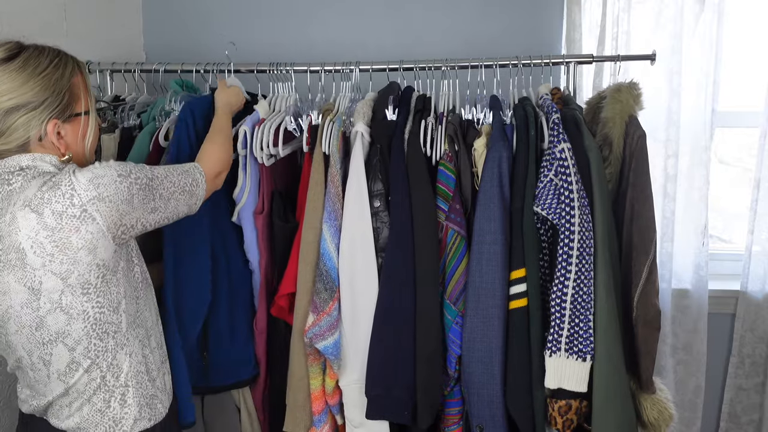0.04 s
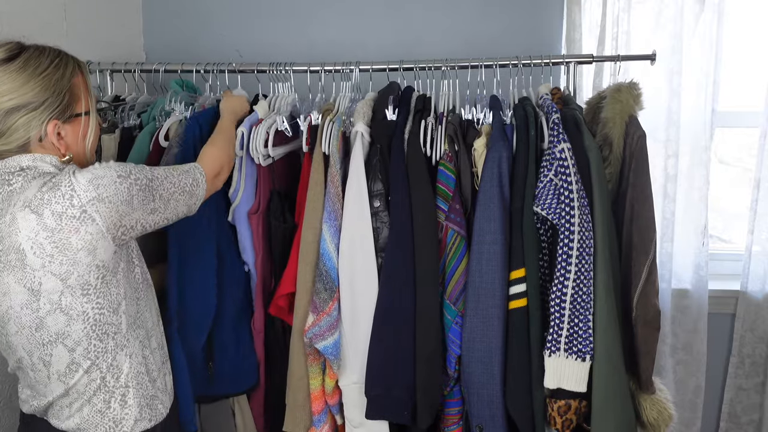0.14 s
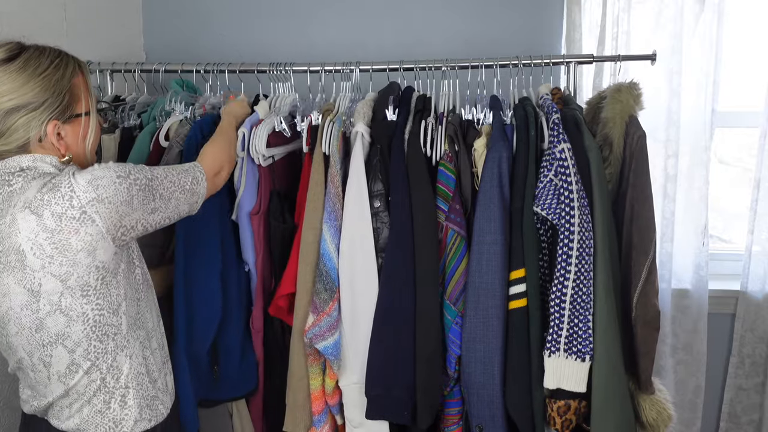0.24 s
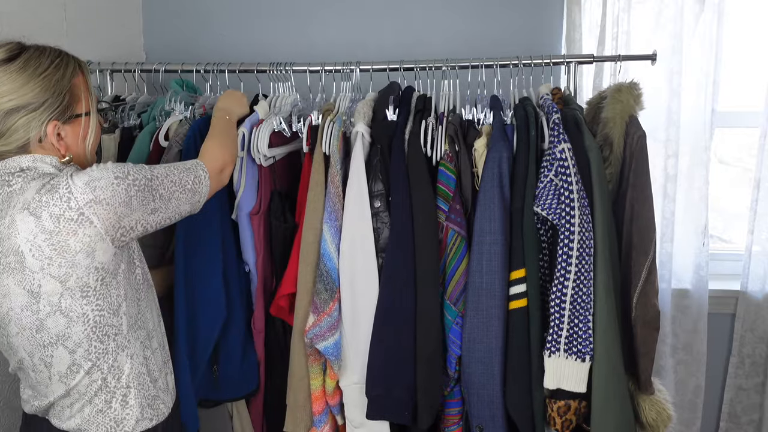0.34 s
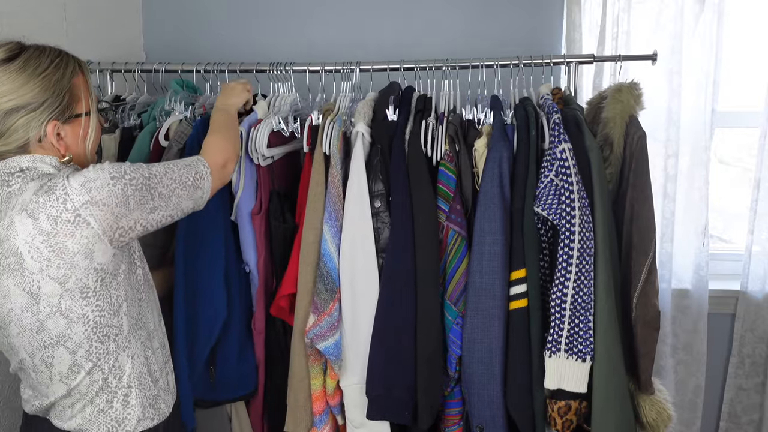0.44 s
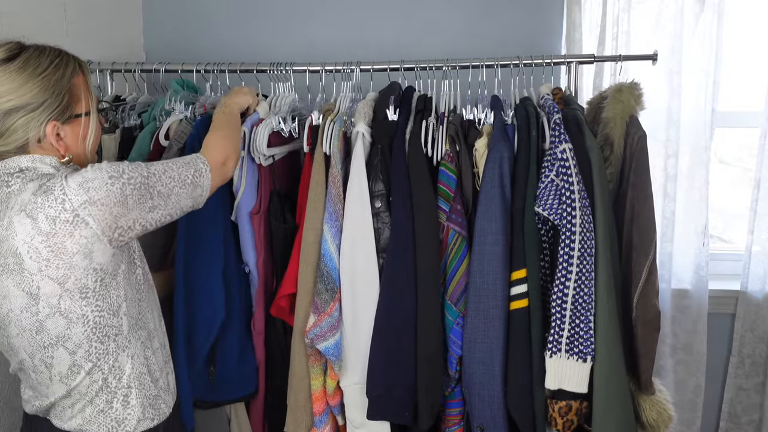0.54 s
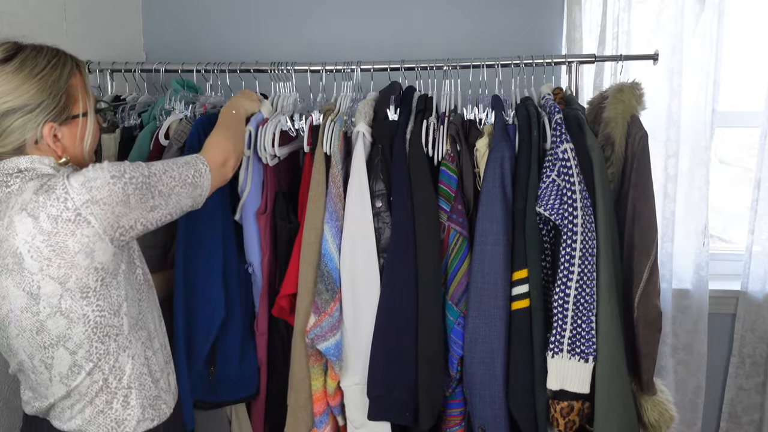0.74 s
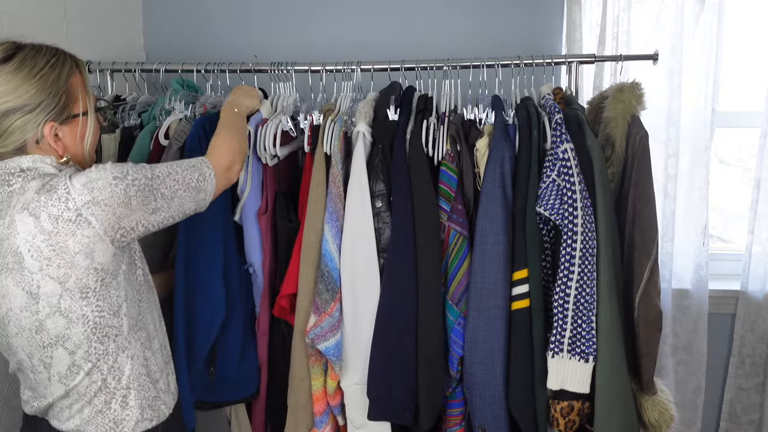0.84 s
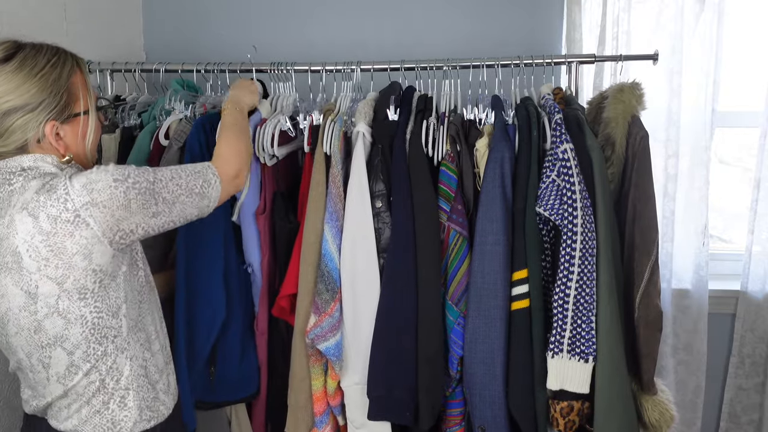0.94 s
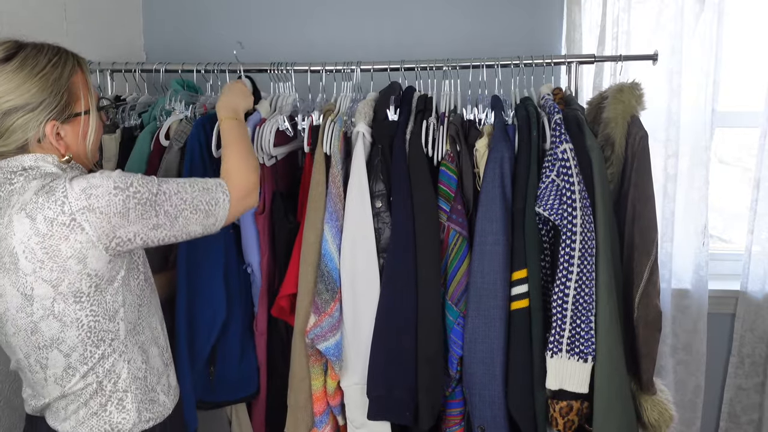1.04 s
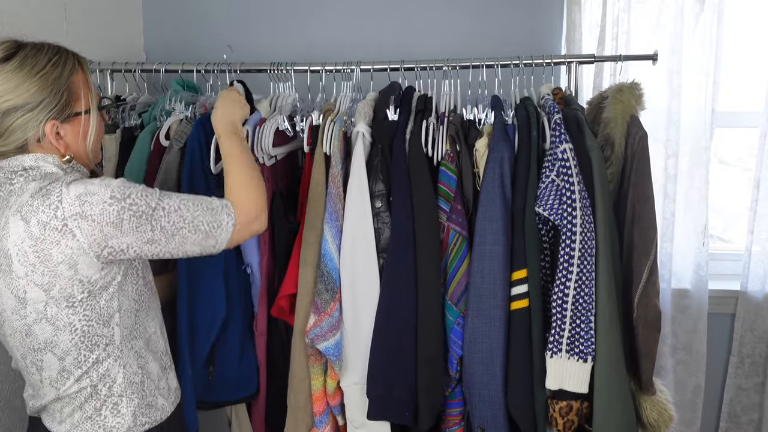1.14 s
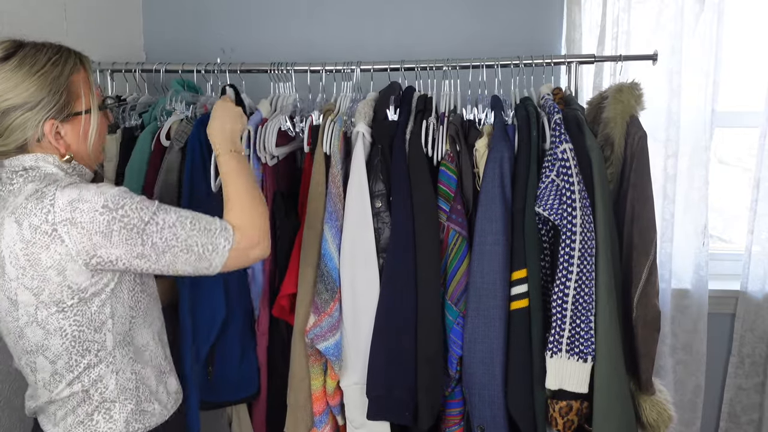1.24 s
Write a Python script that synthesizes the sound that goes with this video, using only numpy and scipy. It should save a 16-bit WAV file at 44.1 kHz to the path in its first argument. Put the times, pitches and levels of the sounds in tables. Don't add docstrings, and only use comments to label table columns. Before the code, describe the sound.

Metal hanger hooks clink and rattle on a steel clothes rail, with a brief squeak

```python
import sys
import numpy as np
from scipy import signal
from scipy.fft import rfft, irfft, next_fast_len
from scipy.io import wavfile
from scipy.ndimage import uniform_filter1d

SR = 44100
rng = np.random.default_rng(int(sys.argv[2]) if len(sys.argv) > 2 else 0)


def ratio_of_db(decibels):
    return 10 ** (np.asarray(decibels, float) / 20)


def materialize(psi):
    bounded = np.clip(np.atleast_2d(psi).T, -1, 1)
    quanta = np.round(bounded * 32767).astype(np.int16)
    wavfile.write(sys.argv[1], SR, quanta)


N = 57330

LEAD = SR // 4


def rms_one(x):
    return x / np.sqrt(np.mean(x ** 2) + 1e-20)


def energy_one(x):
    return x / np.sqrt(np.sum(x ** 2) + 1e-20)


def at_hz(points, hz):
    return np.interp(np.log(hz + 1), np.log(np.array(points)[:, 0]), np.array(points)[:, 1])


def coloured(size, spectrum):
    hz = np.fft.rfftfreq(size, 1 / SR)
    return rms_one(irfft(rfft(rng.standard_normal(size)) * ratio_of_db(at_hz(spectrum, hz)), size))


def drift(rate_hz):
    r = np.exp(-2 * np.pi * rate_hz / SR)
    return rms_one(signal.lfilter([1], [1, -2 * r, r * r], rng.standard_normal(N + LEAD + SR))[SR:])


def evened(x):
    even_hz = 250
    size = 2 * next_fast_len(2 * x.shape[-1])
    spectrum = rfft(x, size)
    broad = uniform_filter1d(abs(spectrum[:1]) ** 2, size=int(even_hz * size / SR))
    cepstrum = irfft(-np.log(broad + 1e-9), size) * (np.arange(size) < size // 2)
    cepstrum[:, 0] /= 2
    return irfft(spectrum * np.exp(rfft(cepstrum)), size)[:, :x.shape[-1]]


def air():
    # f/Hz, level/dB per Hz
    tone_points = [(30, -54), (60, -21), (100, -10.5), (210, -1.5), (600, -9), (1300, -10), (3000, -14.5),
                   (15500, -23)]
    # f/Hz, side minus mid/dB
    width_points = [(60, 1), (110, -1.5), (200, -4.5), (380, 10), (700, -6.5), (1290, -4.5), (2380, 6.5),
                    (4400, -16), (8120, -11), (15000, -19)]
    air_db, wide_db, left_db = -60, -7.0, 0.3
    side_spectrum = [(hz, db + at_hz(width_points, hz)) for hz, db in tone_points]
    mid = coloured(N, tone_points)
    side = ratio_of_db(wide_db) * coloured(N, side_spectrum)
    return ratio_of_db(air_db) * (mid + side * [[1], [-1]]) * ratio_of_db([[left_db], [-left_db]])


def hook(touches, modes, clang, clang_db):
    clang_hz = [1000, 1900, 3000, 4800, 6800, 9000, 13500, 16000]
    ticks_per_s, tick_spread_db, mode_spread_db = 4000, 3.0, 1.2
    narrowest_hz, sharpest_q, low_cut_hz = 8, 95, 1050
    contact_s, clang_t60_s, hook_db = .00025, .012, -9
    out = np.zeros(N + LEAD + SR)
    t = np.arange(SR // 8) / SR
    tick_t = t[:SR // 50]
    contact = 1 - np.exp(-t / contact_s)

    hz, width_hz, mode_db = np.transpose(modes)[:, :, None]
    width_hz = np.maximum(width_hz, np.maximum(narrowest_hz, (hz - 2900) / sharpest_q * 2))
    decay = np.exp(-np.pi * width_hz * t)
    rings = ratio_of_db(mode_db) * width_hz * decay * np.sin(2 * np.pi * hz * t) * contact
    colour = ratio_of_db(at_hz(list(zip(clang_hz, clang)), np.fft.rfftfreq(len(t), 1 / SR)))

    for s, db, chatter_s, start_db in touches:
        draw = rng.random((3, SR // 50))
        tick_amp = ratio_of_db(tick_spread_db * np.log(draw[1])) * np.sign(draw[2] - .5)
        ticks = (draw[0] < ticks_per_s / SR) * tick_amp
        ticks[0] = 1
        left_s = chatter_s - tick_t
        ticks = ticks * ratio_of_db(start_db * left_s / chatter_s) * np.clip(left_s * 1000, 0, 1)
        ticks = evened(ticks[None])[0]

        caught = np.clip(abs(np.exp(2j * np.pi * hz * tick_t) @ ticks), .25, 3)
        mode_amp = ratio_of_db(mode_spread_db * rng.standard_normal(len(modes))) / caught
        body = energy_one(mode_amp @ rings)

        burst = rng.standard_normal(len(t)) * ratio_of_db(-60 * t / clang_t60_s)
        dying = evened(signal.fftconvolve(ticks, burst)[None, :len(t)])[0]
        dense = np.roll(irfft(rfft(dying) * colour, len(t)), 16) * (t < .08) * contact

        hit = signal.fftconvolve(ticks, body)[:len(t)] + ratio_of_db(clang_db) * energy_one(dense)
        start = int((s - contact_s) * SR) + LEAD
        out[start:start + len(hit)] += ratio_of_db(db + hook_db + 20.0) * hit
    low_cut = signal.butter(4, low_cut_hz, "high", fs=SR, output="sos")
    return signal.sosfilt(low_cut, out[:N + LEAD])


def first_hook(clang_db):
    # t/s, peak level/dB, chatter/s, start re end/dB
    first_hook_touches = [
        (-0.05, -25.5, 0.004, -4),
                          (0.1123, -27, 0.0078, -14.5),
    ]
    # f/Hz, width/Hz, level/dB
    first_modes = [(4040, 80, -5), (4520, 90, 0), (4850, 110, -5), (5260, 140, -2), (5700, 90, -9),
                   (6070, 90, -5), (7760, 130, -8), (8240, 140, -9), (11500, 200, -10), (15100, 250, -18)]
    first_clang = [-44, -22, -8, 0, -10, -12, -19, -18]
    return hook(first_hook_touches, first_modes, first_clang, clang_db)


def thin_wire(clang_db):
    # t/s, peak level/dB, chatter/s, start re end/dB
    wire_touches = [
        (.1805, -43, 0.025, 0),
        (.824, -51.5, 0.0043, 0),
    ]
    # f/Hz, width/Hz, level/dB
    wire_modes = [(9000, 370, -4), (10300, 270, 19), (13200, 440, 6)]
    wire_clang = [-27, -35, 9, 3, 4, 3, -10, -9]
    return hook(wire_touches, wire_modes, wire_clang, clang_db)


def second_hook(clang_db):
    # t/s, peak level/dB, chatter/s, start re end/dB
    second_touches = [
        (.214, -21, .002, 0),
        (.2165, -18.5, .003, 0),
        (.2192, -19, .0025, 0),
        (.2235, -27, .002, 0),
        (.2265, -24, .005, 0),
        (.232, -28, .003, 0),
    ]
    # f/Hz, width/Hz, level/dB
    second_modes = [(2600, 80, -16), (4480, 70, 0), (4640, 70, 1), (5770, 70, -3), (6000, 70, 1),
                    (6250, 70, -3), (7300, 120, -10), (9800, 200, -8), (13300, 200, -4), (13790, 200, -5),
                    (14550, 220, -8)]
    second_clang = [-50, -30, -10, -2, -4, -10, -6, -12]
    return hook(second_touches, second_modes, second_clang, clang_db)


def third_hook(clang_db):
    # t/s, peak level/dB, chatter/s, start re end/dB
    third_touches = [
        (.2404, -24, .0015, 0),
        (.242, -17.5, .002, 0),
        (.2445, -21, .002, 3),
        (.247, -22, .002, 0),
        (.2503, -24, .0015, 3),
        (.2525, -19, .002, 0),
        (.2562, -28, .0015, 0),
        (.2775, -40, 0.0029, 0),
    ]
    # f/Hz, width/Hz, level/dB
    third_modes = [(1350, 50, -13), (1900, 60, -14), (2310, 70, -9), (3150, 100, -11), (4630, 70, -4),
                   (4860, 90, -4), (5250, 90, 0), (5860, 95, -6), (6440, 130, -9), (8600, 120, -15),
                   (11300, 140, -8), (13570, 230, -1), (14200, 250, -5)]
    third_clang = [-36, -14, -11, 0, -7, -18, -5, -17]
    return hook(third_touches, third_modes, third_clang, clang_db)


def fourth_hook(clang_db):
    # t/s, peak level/dB, chatter/s, start re end/dB
    fourth_touches = [
        (.3775, -36.5, 0.012, 8),
        (.399, -41, 0.0028, 14),
        (.4208, -35, 0.001, 0),
        (.423, -36.5, 0.0027, 10),
        (.426, -29, 0.012, 28),
        (.431, -49, 0.0044, 1),
        (.451, -41, 0.0028, 14),
        (.755, -38, 0.0088, -24),
    ]
    # f/Hz, width/Hz, level/dB
    fourth_modes = [(2440, 30, -7), (3270, 35, -4), (4410, 95, -2), (5000, 90, -9), (5710, 60, 0),
                    (5850, 60, -1), (6900, 100, -1), (7240, 110, -8), (9550, 220, -12), (11200, 200, -10),
                    (13200, 270, -15)]
    fourth_clang = [-38, -26, -13, -2, -2, -15, -15, -20]
    return hook(fourth_touches, fourth_modes, fourth_clang, clang_db)


def fifth_hook(clang_db):
    # t/s, peak level/dB, chatter/s, start re end/dB
    fifth_touches = [
        (.6443, -21.5, .001, 3),
        (.6463, -20, .0015, 0),
        (.6488, -25, .002, 3),
        (.652, -29, .003, 0),
        (.6565, -33, 0.006, -1),
        (.667, -37, 0.006, -3),
        (.6845, -42, 0.002, 0),
    ]
    # f/Hz, width/Hz, level/dB
    fifth_modes = [(1870, 60, -22), (2440, 60, -15), (4230, 90, -6), (4600, 120, 1), (4940, 90, -3),
                   (5240, 110, -3), (5850, 90, -6), (6020, 90, -1), (7030, 110, 0), (9030, 150, -9),
                   (10050, 150, -9), (11100, 220, -6), (13000, 250, -10), (15200, 300, -14)]
    fifth_clang = [-34, -23, -13, 0, -5, -8, -10, -13]
    return hook(fifth_touches, fifth_modes, fifth_clang, clang_db)


def squeak():
    # t/s, level/dB, slip rate/Hz
    slide_points = [
        (0.754, -80, 2693),
        (.766, -48, 2708),
        (0.774, -42.5, 2700),
        (.784, -39, 2833),
        (0.793, -56, 2862),
        (0.801, -79, 2690),
        (0.814, -71, 2725),
        (0.829, -57.5, 2665),
        (0.847, -64, 2680),
    ]
    overtones = [(.5, -18.5), (1, -8), (2, 0), (2.85, -13)]
    # f/Hz, level/dB
    grind_points = [(1000, -46), (2800, -2), (4300, 4), (5500, 15), (6500, -17), (7800, 4), (10000, -6),
                    (14000, -2.5)]
    slip_jitter, slip_flutter_db = .026, 3.2
    grind_db, grind_follows, full_db, grind_flutter_db = -1, 0.2, -33, 1.5
    s, db, hz = np.transpose(slide_points)
    t = (np.arange(N + LEAD) - LEAD) / SR

    slip_hz = np.interp(t, s, hz) * (1 + slip_jitter * drift(304))
    phase = 2 * np.pi * np.cumsum(slip_hz) / SR
    tone = sum(ratio_of_db(level_db + slip_flutter_db * drift(210)) * np.sin(k * phase) for k, level_db in overtones)

    follow_db = grind_follows * (np.interp(t, s, db) - full_db)
    grind_level_db = grind_db + follow_db + grind_flutter_db * drift(300)
    grind = ratio_of_db(grind_level_db) * coloured(N + LEAD, grind_points)
    return ratio_of_db(np.interp(t, s, db, left=-140, right=-140)) * (tone + grind)


def lifted_hook(clang_db):
    # t/s, peak level/dB, chatter/s, start re end/dB
    lifted_touches = [(1.0725, -40, 0.0028, 6), (1.0755, -31.5, 0.0032, 0.5), (1.086, -40, 0.01, 7),
                      (1.0975, -36.5, 0.0016, 8), (1.102, -33, 0.0064, 3), (1.1105, -37, 0.0013, 13),
                      (1.12, -37, 0.0072, -13), (1.133, -40.5, 0.0059, -21), (1.15, -47, 0.016, -12),
                      (1.167, -46.5, 0.0057, 13), (1.198, -45, 0.02, 4)]
    # f/Hz, width/Hz, level/dB
    lifted_modes = [(2400, 40, -8), (2990, 40, -6), (4100, 60, -4), (4500, 60, 0), (4720, 60, 0),
                    (5200, 70, 1), (5910, 70, -2), (7050, 80, 2), (7800, 200, -8), (9600, 200, -15),
                    (11430, 140, -11), (14900, 180, -13)]
    lifted_clang = [-36, -20, -8, 0, -4.5, -13, -15, -17]
    return hook(lifted_touches, lifted_modes, lifted_clang, clang_db)


def rail_ring(clang_db):
    # t/s, peak level/dB, chatter/s, start re end/dB
    rail_touches = [
        (1.089, -42, .002, 0),
        (1.103, -36, .002, 0),
    ]
    # f/Hz, width/Hz, level/dB
    rail_modes = [(1690, 10, 0), (3275, 8, 6)]
    rail_clang = [-30, -10, 0, 0, -10, -20, -20, -20]
    return hook(rail_touches, rail_modes, rail_clang, clang_db)


def room(x):
    # f/Hz, T60/s
    t60_points = [(1200, 0.38), (2800, 0.32), (4800, 0.22), (8000, 0.17), (14000, 0.14)]
    # f/Hz, side share/dB
    side_points = [(1000, -9), (4000, -6), (8000, -4), (11000, -23), (14000, -34)]
    early_s, early_db, tail_db, build_s = .0055, -12, -4.5, 0.00067
    t = np.arange(SR // 2) / SR
    band_hz = 500 * 2 ** np.arange(0, 5.4, .5)
    early = ratio_of_db(early_db) * energy_one(np.clip((early_s - t) * 2000, 0, 1) * (t > .0005))
    echo = np.zeros((2, len(t)))
    for low, high in zip(band_hz, band_hz[1:]):
        hz = np.sqrt(low * high)
        decay = ratio_of_db(-60 * t / at_hz(t60_points, hz))
        tail = ratio_of_db(tail_db) * energy_one((1 - np.exp(-t / build_s)) * decay)
        noise = rng.standard_normal((2, len(t))) * np.sqrt(early ** 2 + tail ** 2)
        band_pass = signal.butter(2, [low, min(high, .45 * SR)], "band", fs=SR, output="sos")
        echo += signal.sosfilt(band_pass, noise) * ratio_of_db([[0], [at_hz(side_points, hz)]])
    echo[0, 0] += 1
    mid, side = signal.fftconvolve(evened(echo), x[None], axes=1)[:, :len(x)]
    return (mid + side * [[1], [-1]])[:, LEAD:]


def scene():
    clang_share_db = [2, 1, 0, -1, 0, -1, 6, -20]
    left_db = -0.3
    hooks = [first_hook, second_hook, third_hook, fourth_hook, fifth_hook, lifted_hook, thin_wire, rail_ring]
    dry = sum(play(db) for play, db in zip(hooks, clang_share_db)) + squeak()
    return room(dry) * ratio_of_db([[left_db], [-left_db]]) + air()


def roll_off(x):
    return signal.sosfilt(signal.butter(12, 16470, fs=SR, output="sos"), x)


def record(dry):
    cutoff_hz = 16350
    low_pass = signal.cheby2(10, 40, cutoff_hz, fs=SR, output="sos")
    mix = signal.sosfiltfilt(low_pass, dry)
    return roll_off(mix)


dry = scene()
out = record(dry)
materialize(out)
```